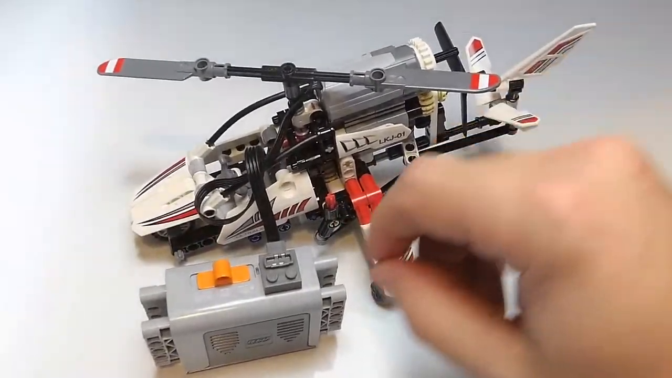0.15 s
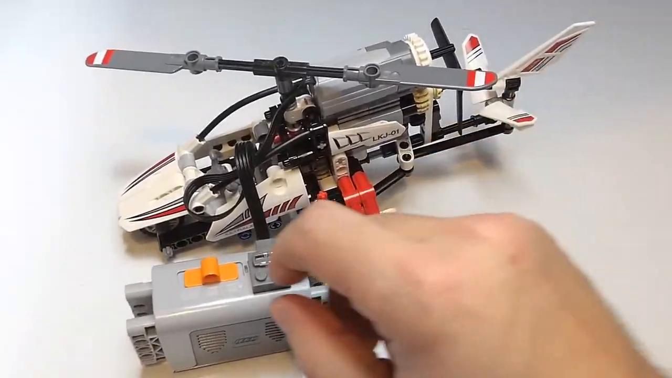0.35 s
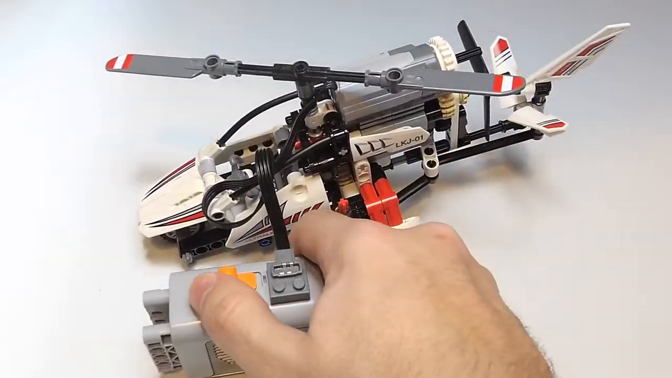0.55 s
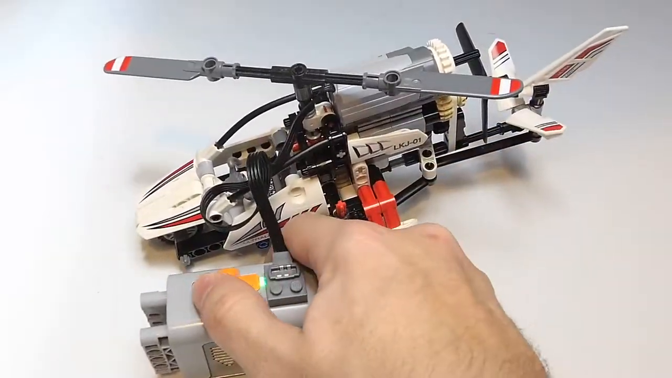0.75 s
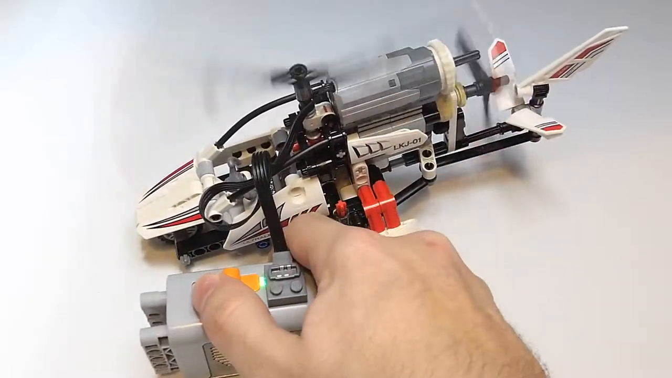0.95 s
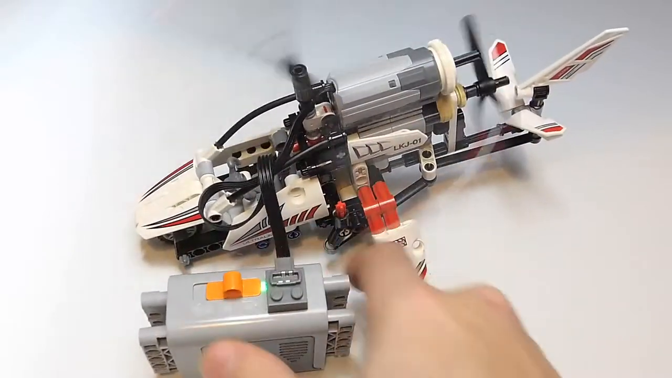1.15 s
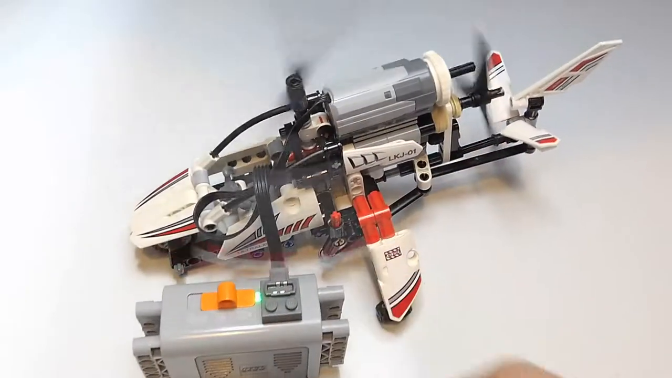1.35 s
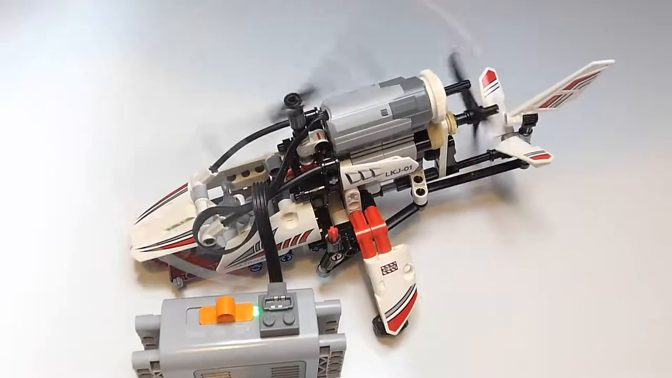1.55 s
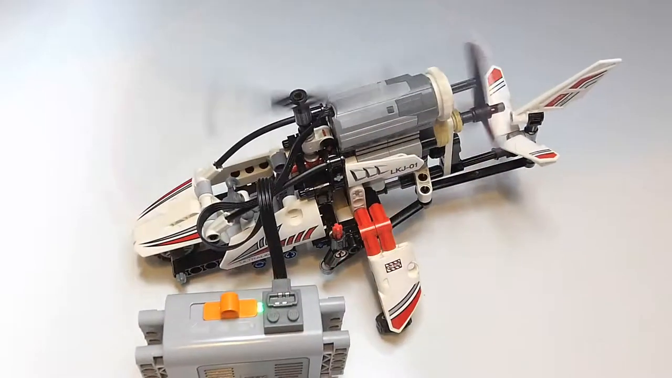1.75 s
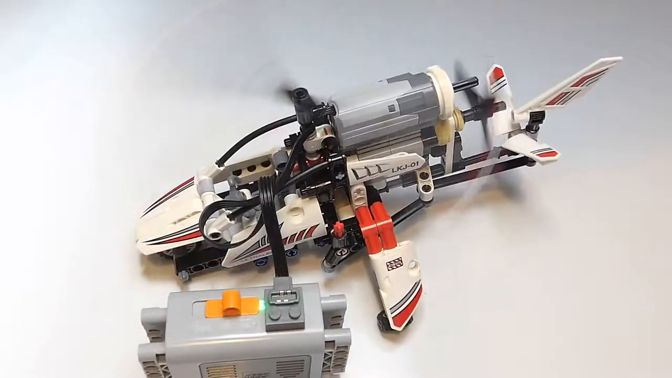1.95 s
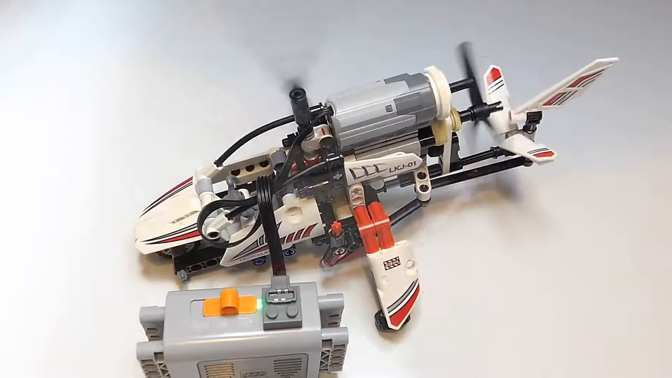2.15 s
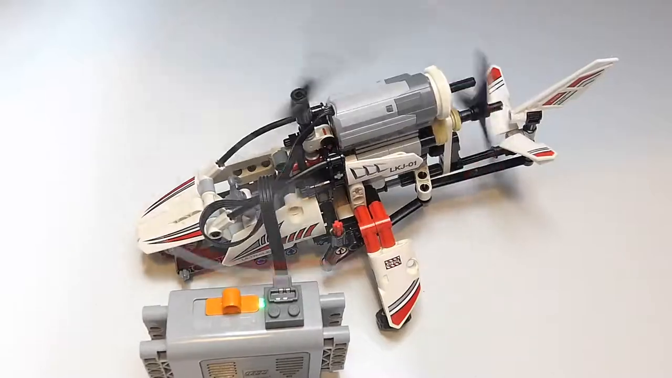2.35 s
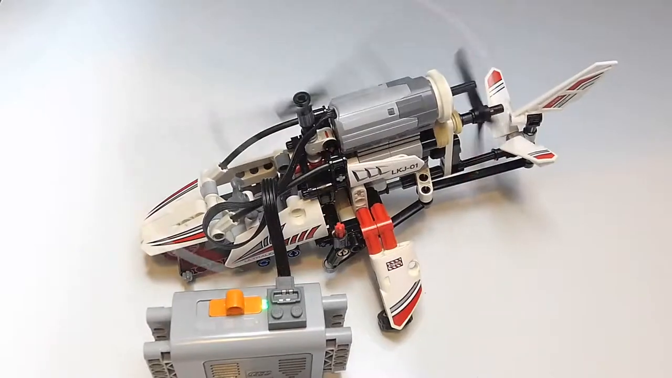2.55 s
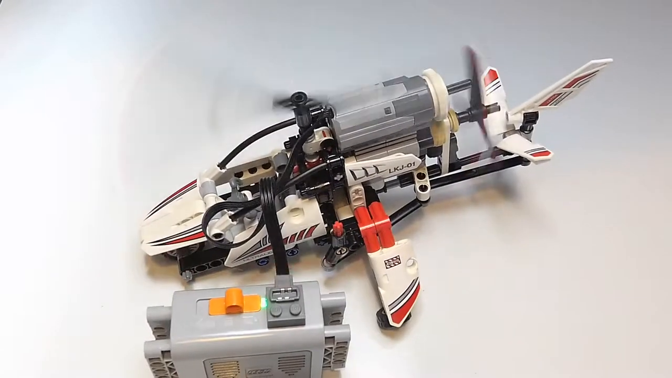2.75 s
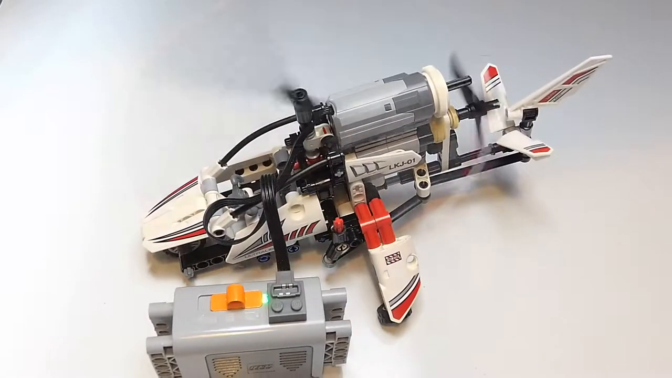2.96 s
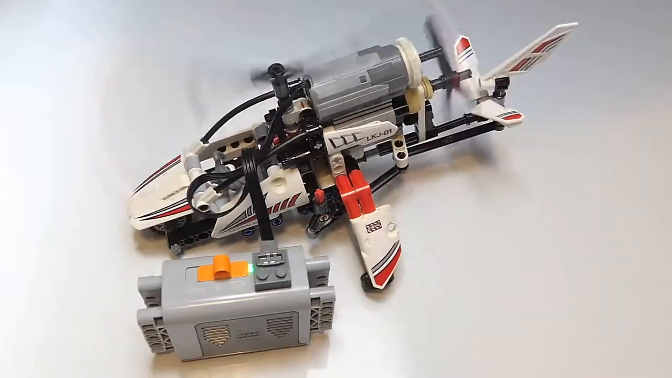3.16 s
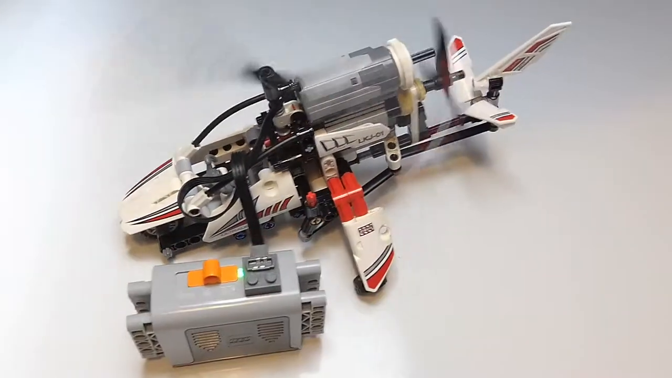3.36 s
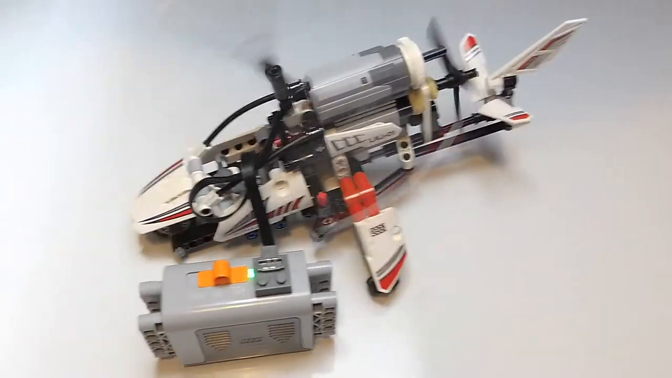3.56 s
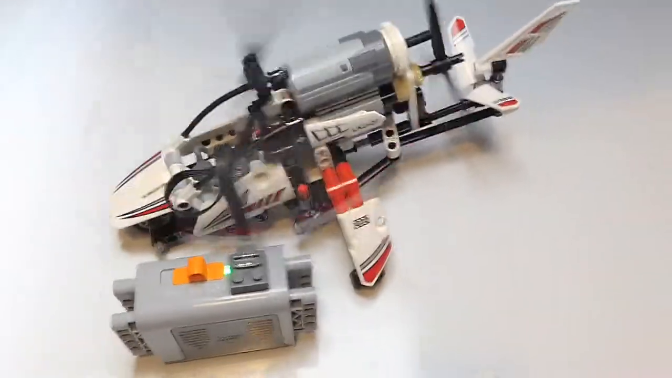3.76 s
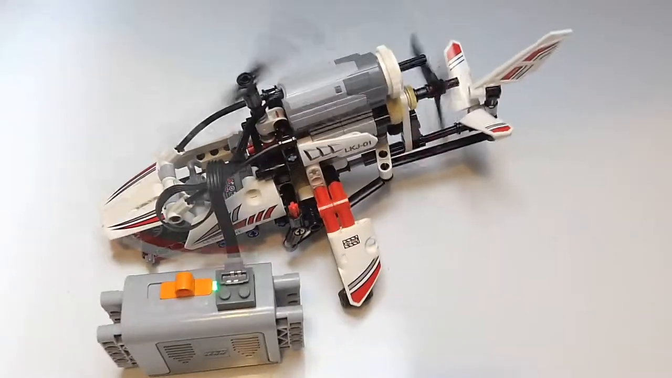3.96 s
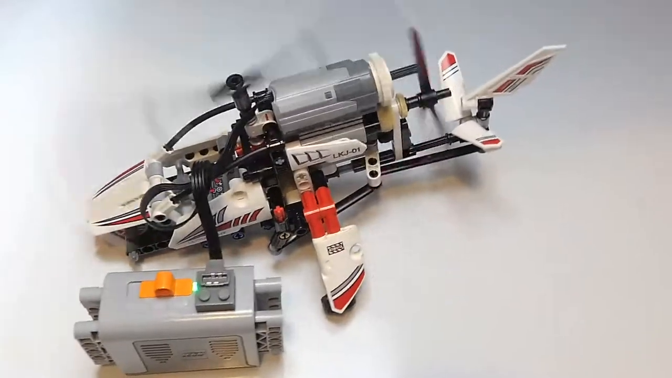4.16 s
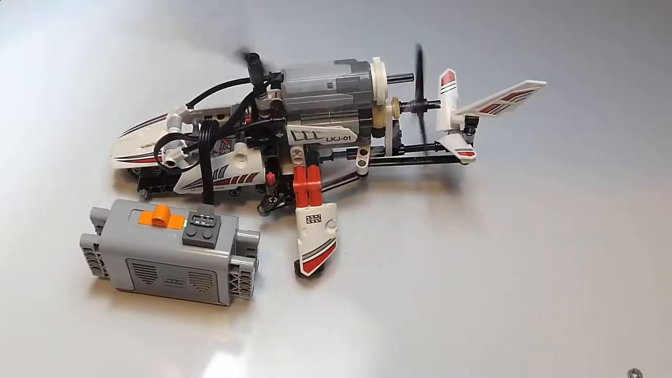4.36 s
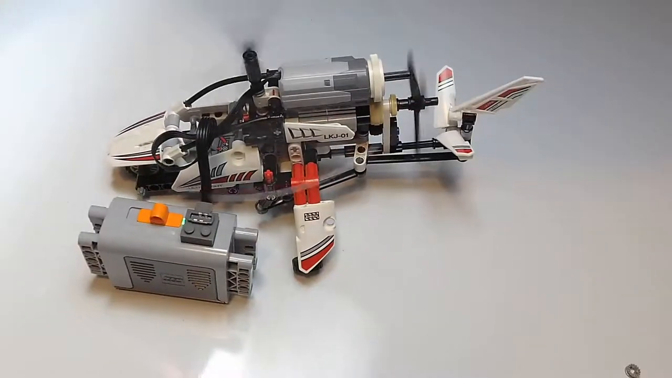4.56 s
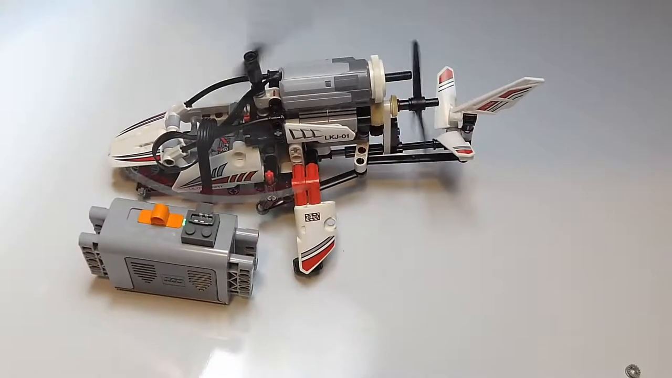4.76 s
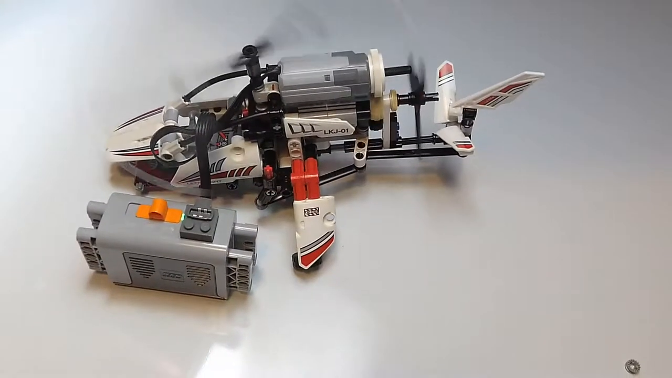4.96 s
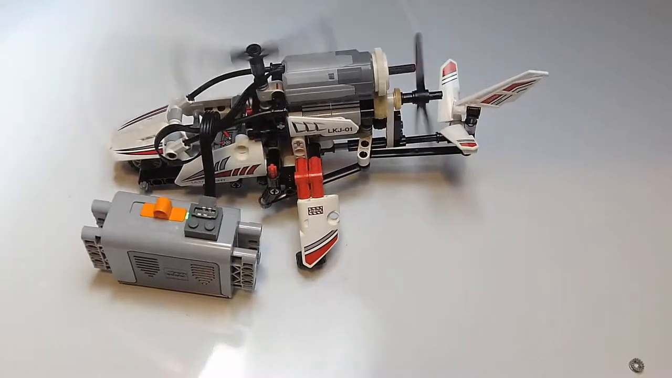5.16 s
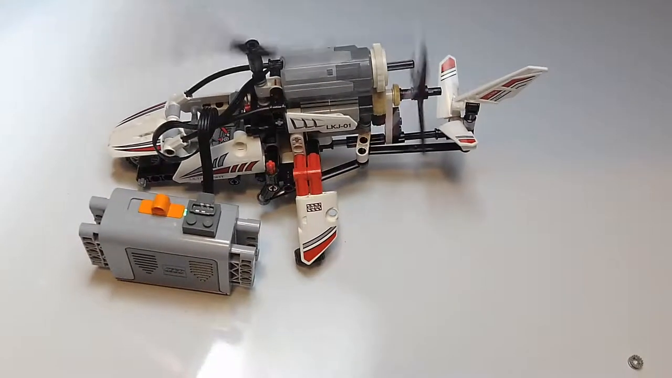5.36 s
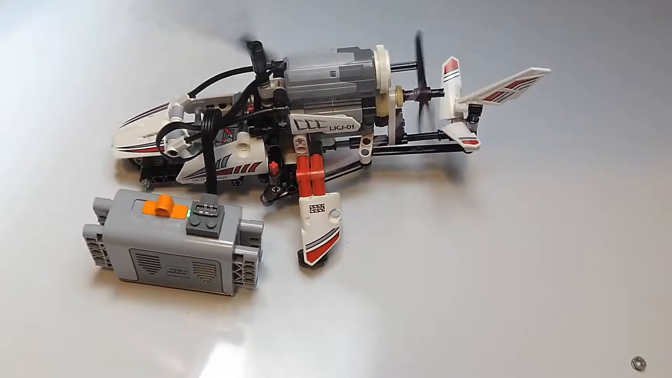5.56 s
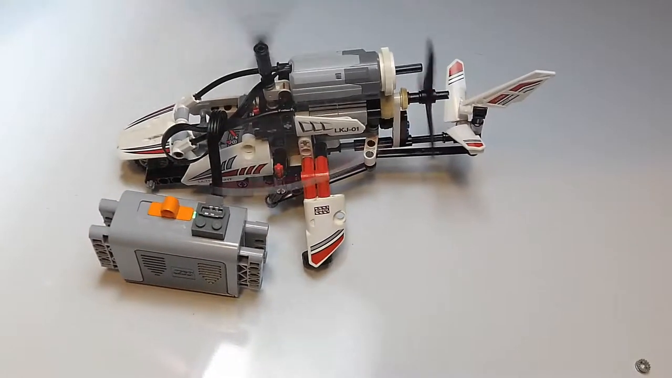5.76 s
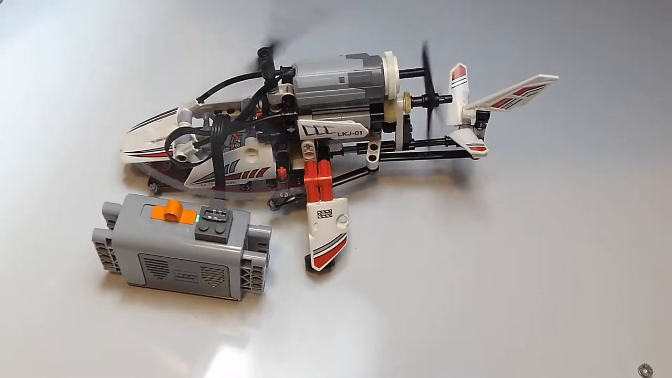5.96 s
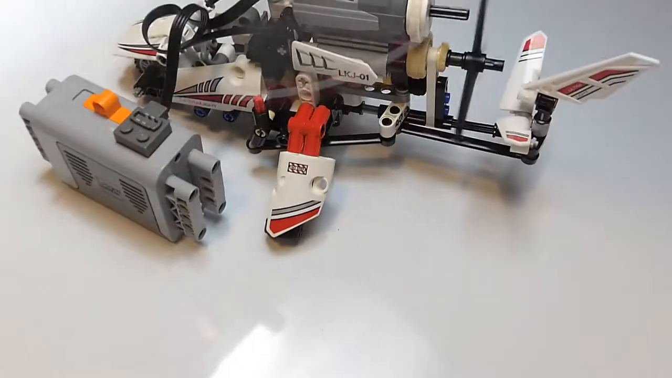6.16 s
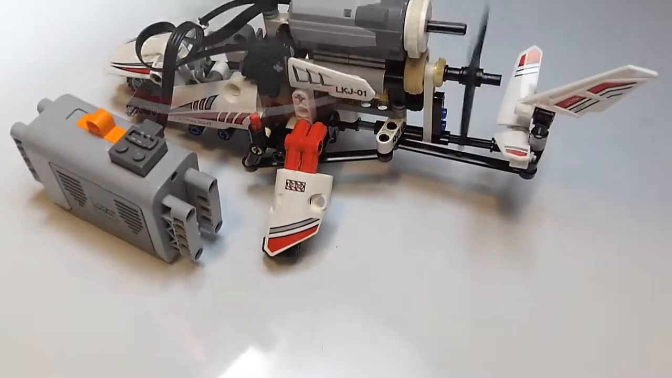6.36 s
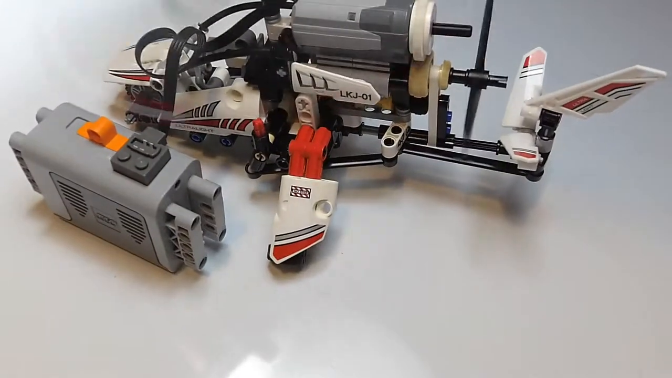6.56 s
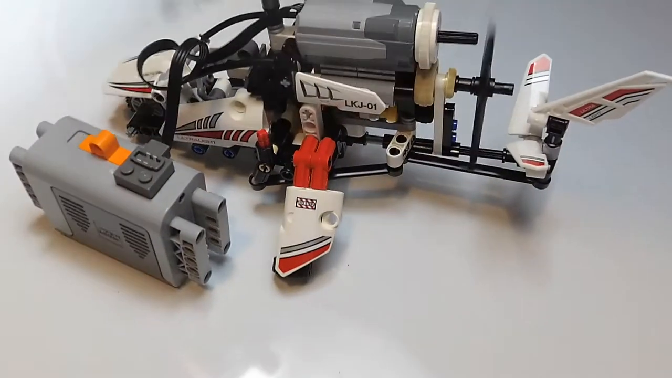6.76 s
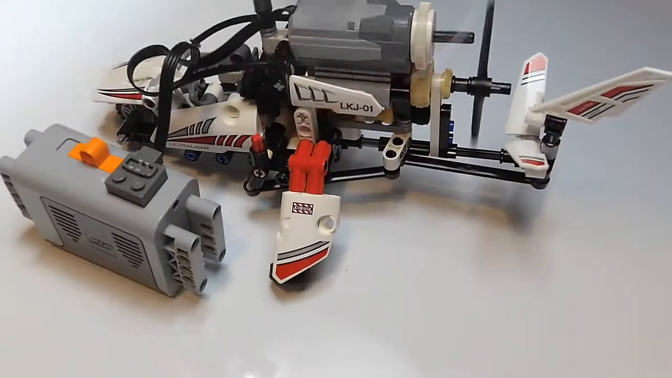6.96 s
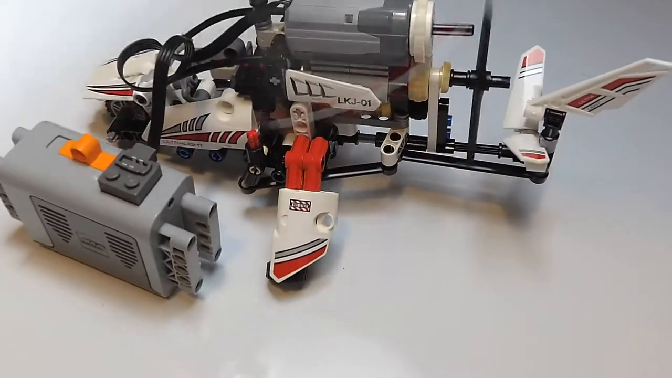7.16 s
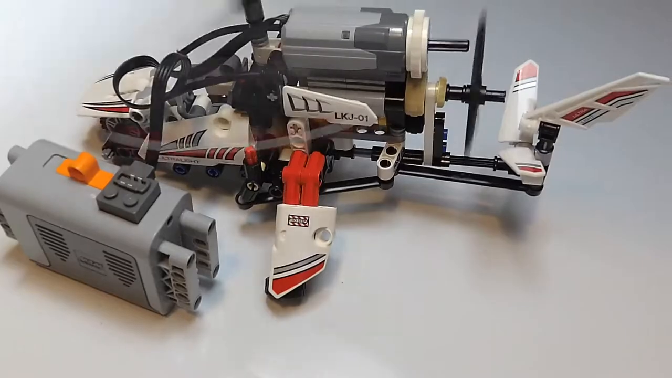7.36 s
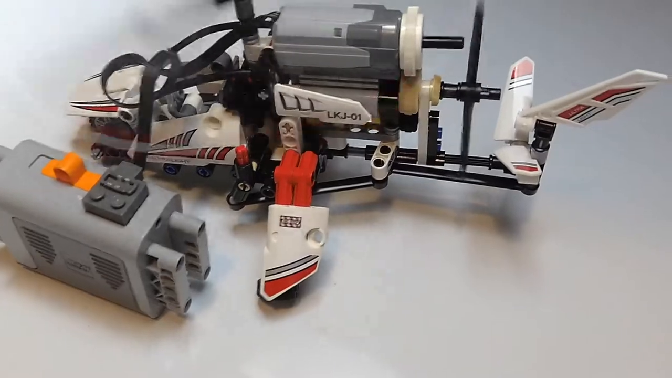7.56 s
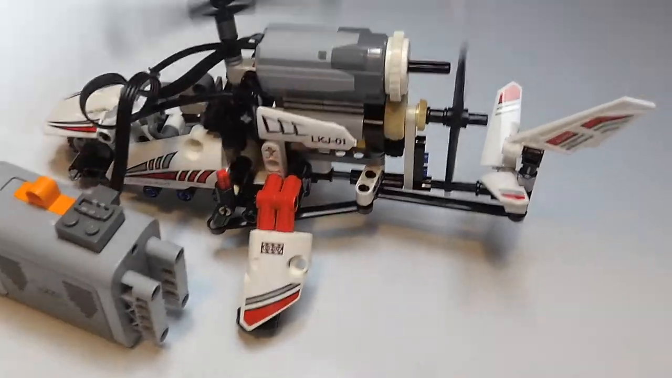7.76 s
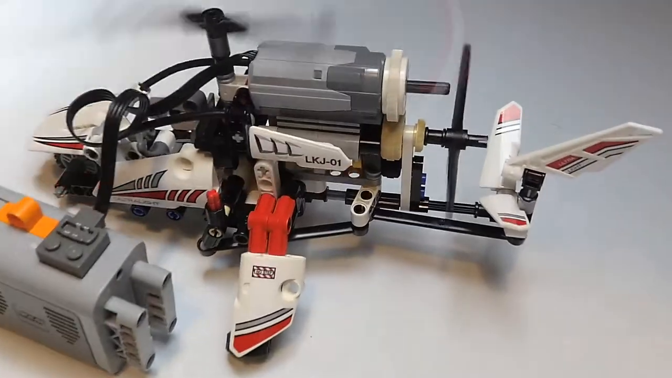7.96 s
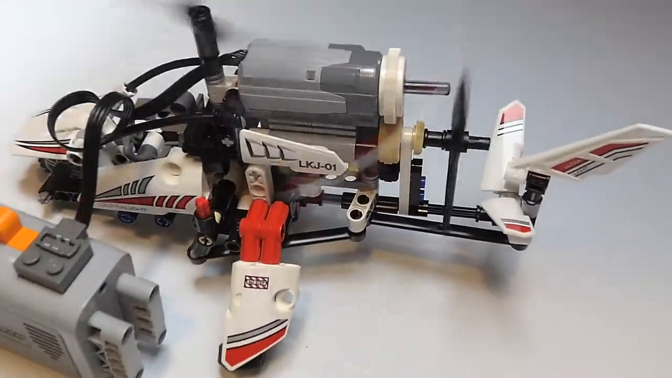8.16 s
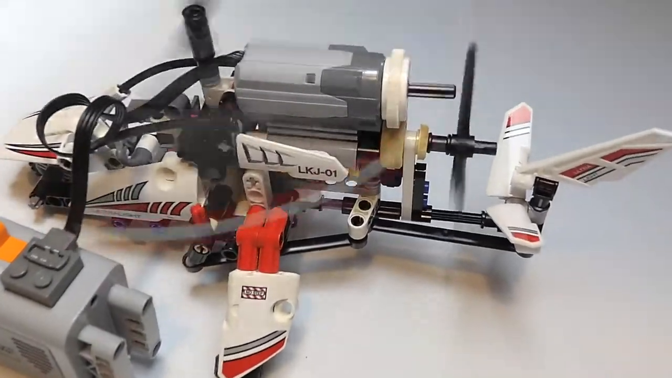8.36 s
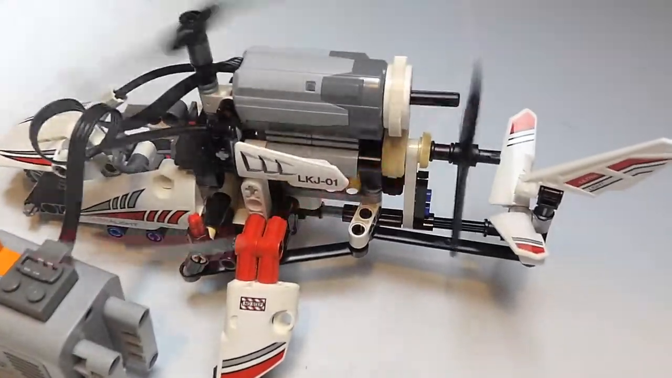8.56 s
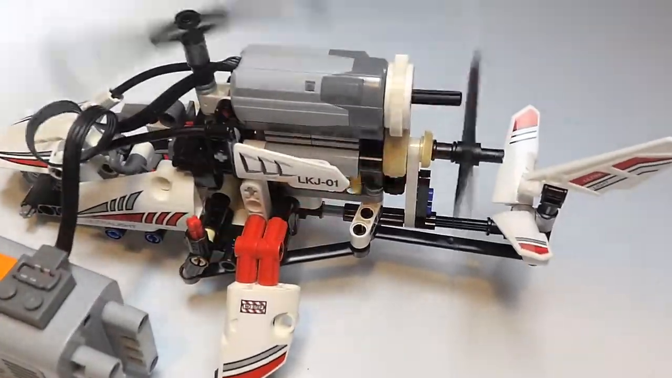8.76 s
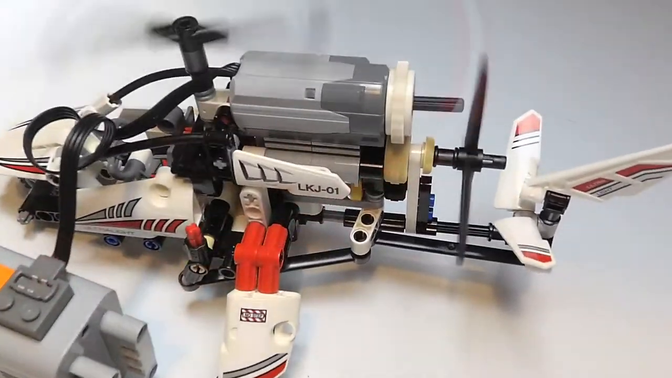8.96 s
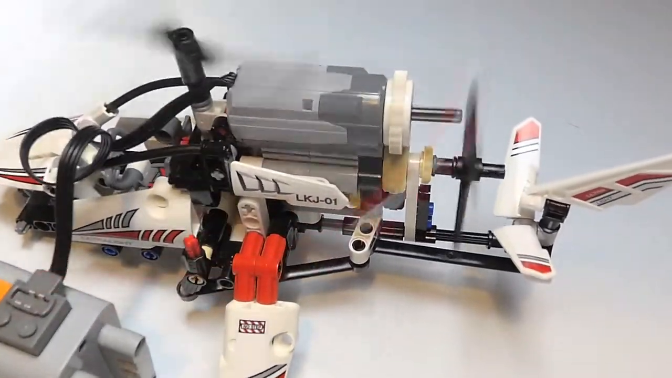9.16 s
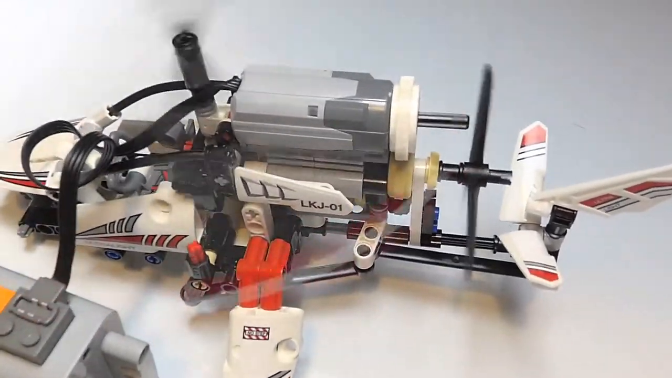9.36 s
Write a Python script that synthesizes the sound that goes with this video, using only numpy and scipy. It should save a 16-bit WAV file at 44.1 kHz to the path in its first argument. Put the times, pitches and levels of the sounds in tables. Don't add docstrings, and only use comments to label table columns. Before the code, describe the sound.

After nearly a second of silence, a small electric motor fades in with a soft hum and ticking gears. Rotor blades soon begin slapping the plastic frame, slow at first, then about twenty cracks a second in an uneven cycle of dull and bright hits. Loose parts clatter and the table rumbles. Brief lift-offs expose the quiet whirr. Close microphone, dry room.

```python
import sys
import numpy as np
from scipy import signal
from scipy.fft import rfft, irfft, next_fast_len
from scipy.io import wavfile
from scipy.ndimage import uniform_filter1d

SR = 44100
rng = np.random.default_rng(int(sys.argv[2]) if len(sys.argv) > 2 else 0)


def generate_wav(sig):
    pcm = np.round(np.clip(np.atleast_2d(sig).T, -1, 1) * 32767).astype(np.int16)
    wavfile.write(sys.argv[1], SR, pcm)


def volts_from_db(level):
    exponent = np.asarray(level, float) / 20
    return 10 ** exponent


N = 414981

# f/Hz, level/dB
DULL_COLOUR = [(290, 11.5), (500, -11), (773, -23), (2190, -7.5), (3150, -4.5), (5390, 1.5), (6510, 1.5),
               (7420, 2.5), (10500, -2.5), (16000, -12)]
BRIGHT_COLOUR = [(290, -31), (500, -39), (668, -29.5), (1670, -28), (2070, -23), (2850, -41), (5550, -2),
                 (7980, 5), (10200, 1), (16000, -9.5)]
# f/Hz, width/Hz, level/dB
BLADE_MODES = [(615, 270, -24.5), (1176, 26, -28.5), (1623, 360, -30), (2220, 150, -24), (2870, 45, -22.5),
               (3850, 150, -23), (4750, 560, -7), (5440, 580, -12.5), (6130, 260, -11.5), (7750, 590, -7.5),
               (9400, 740, -9.5), (10130, 60, -16)]
# crack level/dB, brightness/0-1, thump level/dB, wobble level/dB
FIRST_BLADE = (-16, 0.02, -13.5, -23)
SECOND_BLADE = (-16, -0.04, -12, -26)
THIRD_BLADE = (-13, .92, -17.5, -24.5)
FOURTH_BLADE = (-0.8, 0.5, -21.5, -27)
GLANCE_CHANGE = [
    (1.5, 0.3, -6.5, -1),
    (2, 0.32, -3, -7),
    (1, 0.15, 1, -1.2),
]
# first blade t/s, third blade t/s, level/dB, glance/0-1
EARLY_TURNS = [(1.4402, 1.5794, 0.5, 0.96), (1.706, 1.8228, -0.1, .7), (1.934, 2.0385, -1.5, .2),
               (2.1476, 2.255, .8, 0.6), (2.367, 2.4752, 0.7, 0.93), (2.586, 2.693, 0.1, 0.7),
               (2.7985, 2.906, 0.3, 0.4), (3.0178, 3.1262, 0.5, 0.38), (3.4448, 3.547, -.1, 0),
               (3.653, 3.76, -0.3, 0), (3.866, 3.971, 0.5, 0.94), (4.0738, 4.1773, 1.3, 0.4),
               (4.7382, 4.846, 0.3, 0.57), (4.9536, 5.06, 1, 0.16), (5.1586, 5.2556, 0.6, 0.1),
               (5.3577, 5.4628, -0.4, -.5), (5.5732, 5.6791, -0.2, .6), (5.784, 5.8855, 0.5, .2)]
LATE_TURNS = [(6.3877, 6.4873, -0.5, .02), (6.5902, 6.695, -.1, 0.13), (6.7996, 6.901, -.5, 0.44),
              (7.001, 7.1013, 1.8, .2), (7.2009, 7.3012, .8, 0.2), (7.4025, 7.502, 0.8, 0.22),
              (7.6, 7.699, 0.6, 0.54), (8.021, 8.122, -0.2, 0.26), (8.2215, 8.3193, 0.4, .2),
              (8.4151, 8.5126, 0.9, .1), (8.609, 8.7068, -0.2, 0.74), (8.8063, 8.9054, 0.2, 0.6),
              (9.0026, 9.1002, -.6, 0.26), (9.1995, 9.2976, 0.6, 0)]
# t/s, crack level/dB
FOURTH_HITS = [
    (1.8793, -14.5),
    (4.0237, -19),
    (4.6821, -16.5),
    (5.11, -10.5),
    (5.7324, -14.5),
    (6.7487, -12),
    (7.9688, -10.5),
]
# t/s, crack level/dB, brightness/0-1, thump level/dB, wobble level/dB
STRAY_SLAPS = [(1.2022, -17, 1, -35, -41), (1.3493, -12, 0.76, -19.5, -27.5), (1.476, -45, 0, -18.5, -16),
               (3.242, -47, 0.2, -45, -17.5), (3.2863, -13, 0.16, -12, -28),
               (3.3402, -14, 0.85, -15, -25.5), (4.389, -12.5, 1, -13, -25), (4.502, -29, 0.1, -34, -32),
               (4.5605, -13.5, 0.46, -17, -40), (4.6215, -13, 1, -16, -25.5),
               (5.9858, -13.5, 0.5, -14, -23), (6.0362, -23, 0.7, -21, -54), (6.231, -57, 0.5, -45.0, -29),
               (6.2869, -12.5, 1.0, -17, -26), (7.8578, -13.5, 0.44, -16.5, -35),
               (7.9147, -14, 0.7, -17, -25.5), (9.3966, -15, 0, -14.5, -30.0)]
# f/Hz, level/dB, t60/s
KNOCK_MODES = [(920, 1, .04), (1250, -5, .04), (1700, -4, .035), (2080, -7, .05)]
# f/Hz, level/dB
SCRAPE_COLOUR = [(400, -30), (750, -2), (920, -7), (1150, 1.5), (1700, -2), (2200, -5), (3200, -3),
                 (9000, -19)]
# f/Hz, level/dB
WHIRR_COLOUR = [(25, -22), (50, -12), (84, -4), (110, -3.5), (170, -11), (250, -12), (400, -10.5),
                (1000, -17.5), (2400, -22.5), (4000, -21.5), (5700, -33.5), (10500, -39), (11500, -47),
                (16000, -62)]
# f/Hz, width/Hz, level/dB
HOUSING_MODES = [(84, 22, -49), (2780, 70, -54), (3450, 80, -57), (4020, 100, -56), (4670, 100, -58)]
# share of the turn/0-1, level/dB
TEETH = [
    (0, -34),
    (.17, -40),
    (.43, -45),
    (.74, -38),
]
# t/s, turns made
GEAR_TURNS = [
    (.8354, 0),
    (1.2635, 4),
    (3.172, 22),
    (4.26, 32),
    (6.2137, 50),
    (9.55, 81),
]
# from t/s, to t/s
PAUSES = [
    (0, 1.195),
    (3.149, 3.262),
    (4.255, 4.372),
    (6.043, 6.258),
]
# t/s, level/dB
SHAKE = [(1.2, -40), (1.32, -24), (1.58, -0.5), (2.1, 2), (3.1, 1), (3.3, -3), (3.35, 0.1), (4.0, 0),
         (4.2, -5), (4.45, -2.5), (5.87, -1.5), (6.04, 4.5), (6.25, -12), (6.42, 2), (7.7, 0), (7.97, -4),
         (8.16, 1), (9.41, 0.5)]
# f/Hz, level/dB
CLATTER_COLOUR = [(150, -4), (330, -3), (678, -6), (930, -6.5), (2070, -16.5), (2790, -19.5), (4020, -33),
                  (4830, -17.5), (7950, -19.5), (16000, -50)]
# f/Hz, width/Hz, level/dB
RATTLE_MODES = [(4020, 280, -13), (5770, 220, -20), (8200, 390, -25), (10100, 260, -26)]
# f/Hz, level/dB
RUMBLE_COLOUR = [(20, -12), (40, -4), (80, -3), (130, -8), (200, -21), (350, -15), (520, -19), (900, -45)]


def evened(x):
    return x / np.sqrt(np.mean(x ** 2) + 1e-20)


def noise(points):
    size = next_fast_len(N)
    f, db = np.transpose(points)
    hz = np.fft.rfftfreq(size, 1 / SR)
    colour = volts_from_db(np.interp(np.log(hz + 1), np.log(f), db, left=-90, right=-90))
    return evened(irfft(rfft(rng.standard_normal(size)) * colour, size)[:N])


def add(mix, s, sound):
    part = mix[round(s * SR):][:len(sound)]
    part += sound[:len(part)]


def resonate(x, hz, width):
    r = np.exp(-np.pi * width / SR)
    return 2 * signal.lfilter([1 - r], [1, -r * np.exp(2j * np.pi * hz / SR)], x).real


def flicker(samples, db):
    smooth = uniform_filter1d(rng.standard_normal(N), int(samples))
    smooth = uniform_filter1d(smooth, int(samples))
    return volts_from_db(db * evened(smooth))


def slaps():
    second_at = 0.498
    rows = list(STRAY_SLAPS)
    rows += [(s, db + FOURTH_BLADE[0], *FOURTH_BLADE[1:]) for s, db in FOURTH_HITS]
    blades = FIRST_BLADE, SECOND_BLADE, THIRD_BLADE
    for first_s, third_s, db, glance in [*EARLY_TURNS, *LATE_TURNS]:
        times = first_s, first_s + second_at * (third_s - first_s), third_s
        for s, blade, change in zip(times, blades, GLANCE_CHANGE):
            harder = np.add(blade, (db, 0, db, db))
            rows.append((s, *(harder + glance * np.array(change))))
    return np.array(sorted(rows))


def cracks(hits):
    dull, bright, body, snap = np.zeros((4, N))
    t = np.arange(2600) / SR
    first_touch = (1 - t / 0.00006) * np.exp(-t / 0.00006)
    rung = np.zeros((len(BLADE_MODES), N))
    chance = rng.standard_normal((len(hits), len(BLADE_MODES) + 1))
    for (s, db, brightness, _, _), c in zip(hits, chance):
        mix = np.clip(brightness, 0, 1)
        u = t / (1 + 0.89 * np.exp(-(s - hits[0, 0]) / 0.21))
        u = u * (1 + 0.3 * max(-18.5 - db, 0))
        hold = 0.0025 + 0.0045 * mix + 0.002 * np.tanh(c[0]) ** 2
        after = np.maximum(u - hold, 0)
        rise = np.minimum(u / 0.0023, 1) ** 0.68
        rise = rise * (0.8 + 0.42 * np.exp(-u / 0.003))
        fall = np.exp(-after / (0.005 - 0.0036 * mix)) + 0.0068 * np.exp(-after / 0.0018)
        shape = volts_from_db(db) * rise * fall
        add(dull, s, np.sqrt(1 - mix) * shape)
        add(bright, s, np.sqrt(mix) * shape)
        body_db = db - 20.0 * mix + 3.9 * np.tanh(c[-1])
        add(body, s, volts_from_db(body_db) * u / 0.0055 * np.exp(1 - u / 0.007))
        for k in range(len(BLADE_MODES)):
            add(rung[k], s, volts_from_db(3.99 * c[k]) * shape[:1400])
        snap_s = s + 0.00121 + 0.0006 * np.tanh(c[1])
        add(snap, snap_s, -volts_from_db(db + 1.5 + 2.5 * np.tanh(c[2])) * first_touch)
    white = rng.standard_normal(N)
    modes = sum(volts_from_db(db) * e * evened(resonate(white, hz, w)) for e, (hz, w, db) in zip(rung, BLADE_MODES))
    frame_noise = noise([(350, -2.5), (600, 0.5), (1200, 0.5), (2200, -3.0), (3500, -7.0), (6000, -10)])
    air = (dull * noise(DULL_COLOUR) + bright * noise(BRIGHT_COLOUR)) * flicker(23, 0.98)
    ragged = flicker(75, 2.5)
    return (0.73 * air + volts_from_db(-7.0) * modes) * ragged + snap + volts_from_db(-15.5) * body * frame_noise


def wavelet(t, at, hz, spread):
    return -np.cos(2 * np.pi * hz * (t - at)) * np.exp(-0.5 * ((t - at) / spread) ** 2)


def knock(t, spot):
    ring = 0
    for (hz, db, t60), p, q in zip(KNOCK_MODES, spot, spot[::-1]):
        ring = ring + volts_from_db(db - 10 * p - 60 * t / t60) * np.sin(2 * np.pi * hz * (0.94 + 0.1 * q) * t)
    return np.minimum(t / 0.002, 1) * ring


def flexes(hits):
    out, scrape, tick = np.zeros((3, N))
    t = np.arange(3300) / SR
    chance = rng.random((len(hits), 8))
    gaps = np.diff(hits[:, 0], append=N / SR + 1)
    for (s, _, _, thump_db, wobble_db), gap, c in zip(hits, gaps, chance):
        thump = wavelet(t, 0.005975, 235 * (0.95 + 0.19 * c[0]), 0.002)
        thump += 0.3 * wavelet(t, 0.011235, 351, 0.0028)
        thump += 0.41 * wavelet(t, 0.01746 + 0.0028 * c[1], 110.4, 0.0036)
        alone = gap > 0.075
        period = 0.107
        if gap < 0.075:
            period = 2 * gap
        elif gap < 0.14:
            period = gap
        slow = np.clip(period, 0.095, 0.125) * 10
        hz = 95 + 2500 * (t - 0.004) / slow * (0.92 + 0.29 * c[2])
        end = min(0.066 * slow, gap + 0.003)
        swell = np.clip((t - 0.011) / 0.032, 0, 1) ** 1.3 * np.clip((end - t) / 0.011, 0, 1)
        cycles = np.cumsum(hz) / SR + 0.23 + 0.12 * c[3]
        if not alone:
            cycles -= np.interp(gap + 0.006, t, cycles) + 0.25 + 0.1 * (c[3] - 0.5)
        wobble = swell * np.sin(2 * np.pi * cycles)
        add(out, s - 0.004, volts_from_db(thump_db) * thump + volts_from_db(wobble_db) * wobble)
        if alone:
            stop_db = -24 if wobble_db > -40 else wobble_db
            add(out, s + 0.0635 * slow, volts_from_db(stop_db - 2.5 + 3 * c[5]) * knock(t, c[[0, 1, 2, 4]]))
            scrape_shape = np.minimum(t / 0.0039, 1) * np.exp(-t / 0.015)
            add(scrape, s + 0.0643 * slow, volts_from_db(stop_db - 9.5 + 2 * c[6]) * scrape_shape)
            tick_shape = t / 0.006 * np.exp(1 - t / 0.0034)
            add(tick, s + 0.055 * slow, volts_from_db(stop_db - 18.5 + 6.2 * c[7]) * tick_shape)
    return out + scrape * noise(SCRAPE_COLOUR) * flicker(30, 2.0) + tick * noise(BRIGHT_COLOUR)


def motor():
    ticks, t = np.zeros(N), np.arange(900) / SR
    shape = (1 - np.exp(-t / 0.0004)) * np.exp(-t / 0.0035)
    s, made = np.transpose(GEAR_TURNS)
    for turn in range(int(made[-1])):
        for share, db in TEETH:
            tick_s = np.interp(turn + share, made, s)
            add(ticks, tick_s, volts_from_db(db + 1.5 * rng.standard_normal()) * shape)
    shaking = 1 + 80 * uniform_filter1d(ticks, size=500, origin=240)
    shaken = rng.standard_normal(N) * shaking * flicker(430, 3.1)
    housing = sum(volts_from_db(db) * evened(resonate(resonate(shaken, hz, w), hz, 3 * w)) for hz, w, db in HOUSING_MODES)
    tick_colour = noise([(1500, -1), (3000, -10), (4200, 1), (6000, -0.5), (7500, -6.5), (16000, -19)])
    whirr = volts_from_db(-43.5) * noise(WHIRR_COLOUR) * flicker(480, 1.9)
    return whirr + housing + ticks * tick_colour


def frame():
    clatter_db, clatter_follows, rumble_db = -41, 0.19, -40
    shake_db = np.interp(np.arange(N) / SR, *np.transpose(SHAKE))
    grains = rng.standard_normal(N) * flicker(36, 1.9)
    rattle = sum(volts_from_db(db) * evened(resonate(grains, hz, w)) * flicker(500, 2.4) for hz, w, db in RATTLE_MODES)
    clatter = noise(CLATTER_COLOUR) * flicker(160, 2.07) + rattle
    clatter = volts_from_db(clatter_db + clatter_follows * shake_db) * clatter
    return clatter + volts_from_db(rumble_db + shake_db) * noise(RUMBLE_COLOUR) * flicker(760, 4.1)


def scene():
    t, hits = np.arange(N) / SR, slaps()
    free = sum(np.clip(np.minimum(t - a, b - t) / 0.0091 + 1, 0, 1) for a, b in PAUSES)
    touching = 1 - free
    return (motor() + cracks(hits) + touching * (flexes(hits) + frame()))[None]


def top_cut(x):
    return signal.sosfilt(signal.butter(12, 16970, fs=SR, output="sos"), x)


def record(dry):
    start_s, fade_s, edge_hz = 0.822, 0.079, 15850
    fade = np.clip((np.arange(N) / SR - start_s) / fade_s, 0, 1) ** 1.6
    soft = 0.95 * np.tanh(dry * fade / 0.95)
    edge = signal.firwin(255, edge_hz, window=("kaiser", 7), fs=SR)[None]
    mix = signal.oaconvolve(soft, edge, "same")
    return top_cut(mix)


dry = scene()
out = record(dry)
generate_wav(out)
```